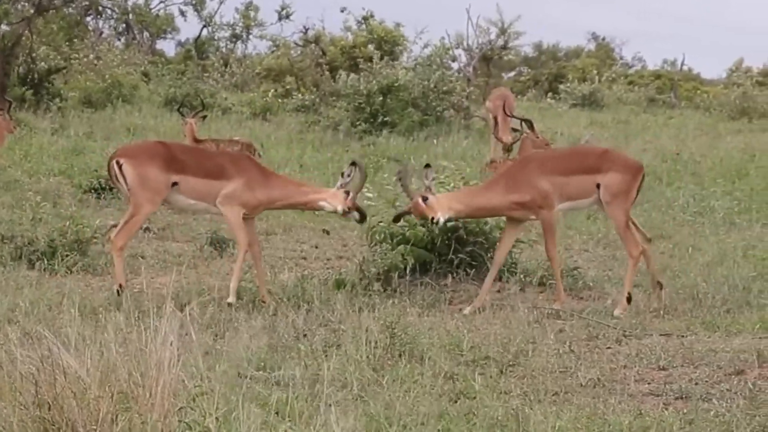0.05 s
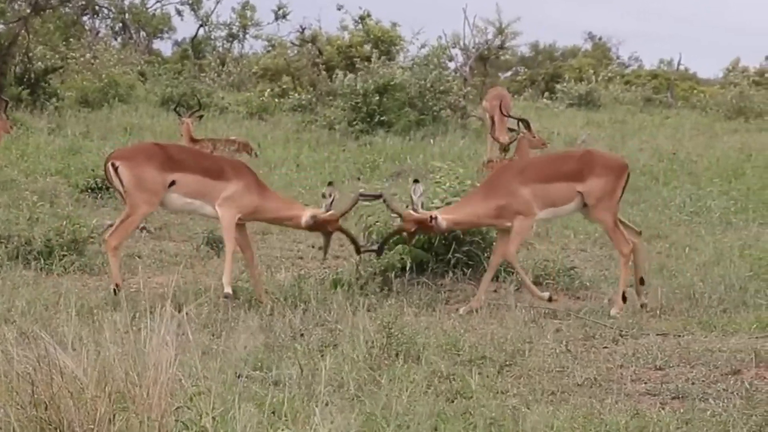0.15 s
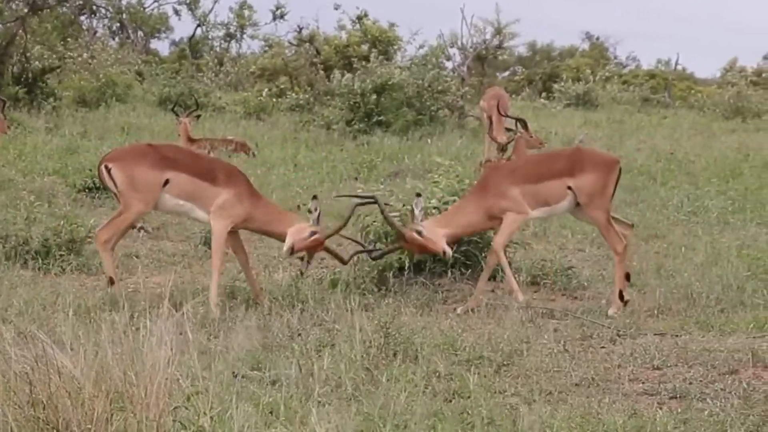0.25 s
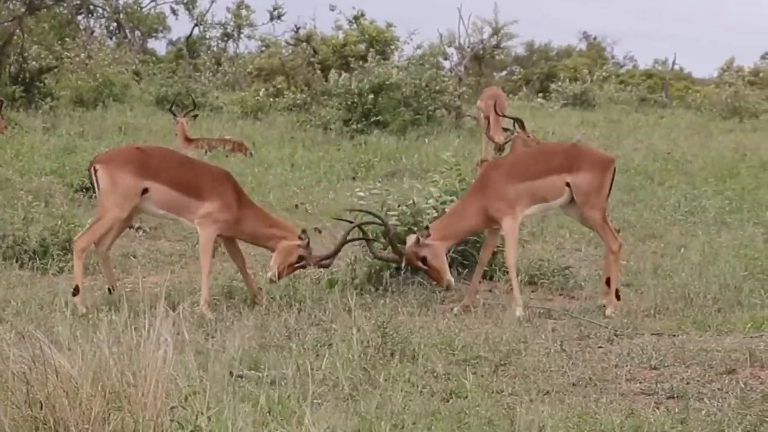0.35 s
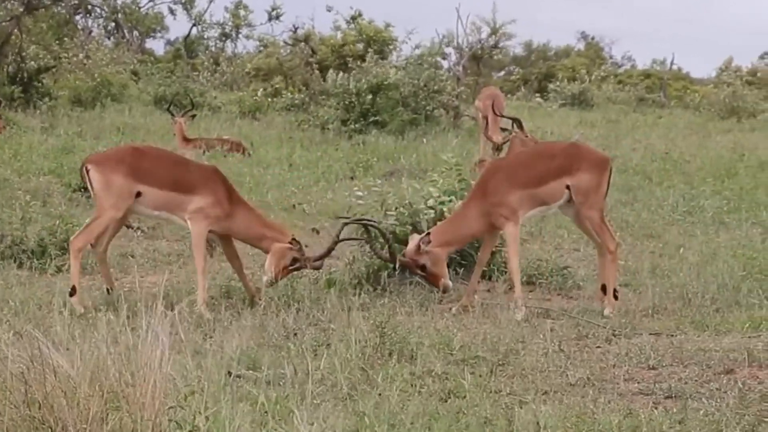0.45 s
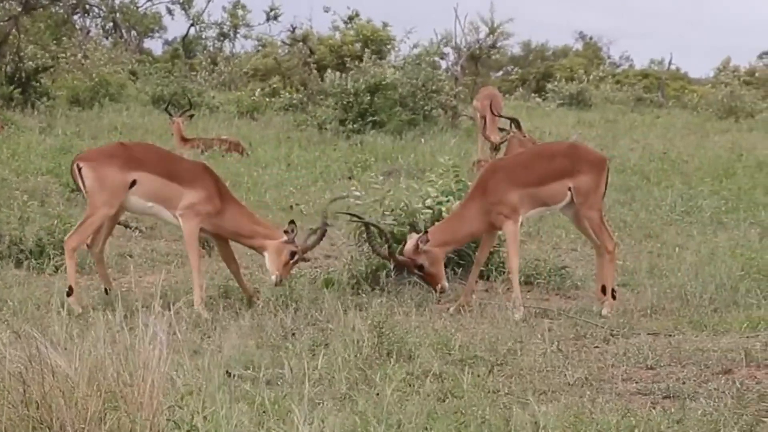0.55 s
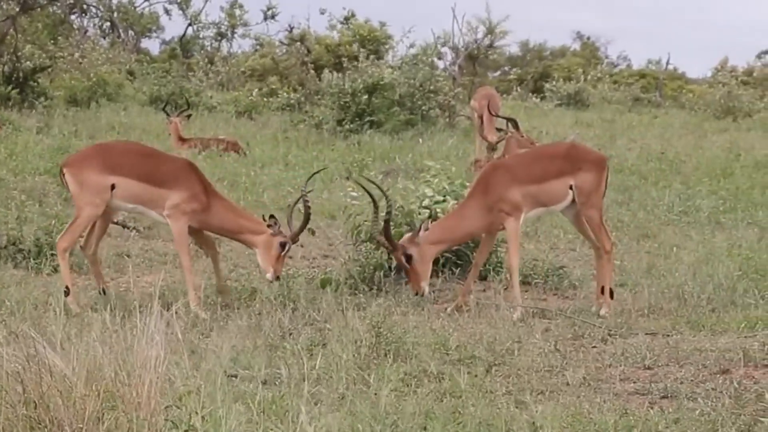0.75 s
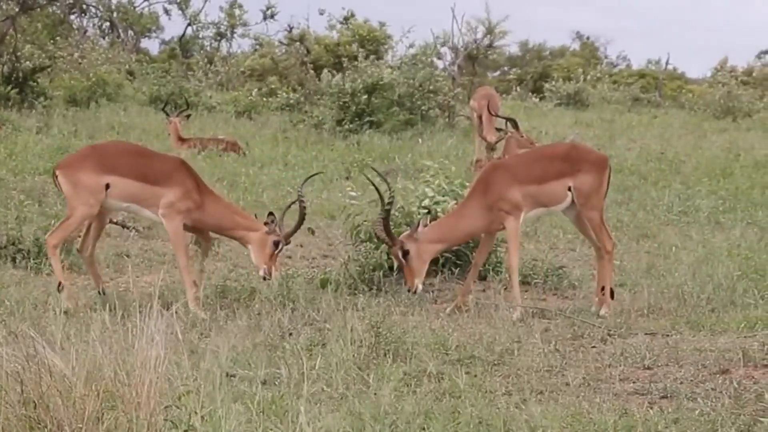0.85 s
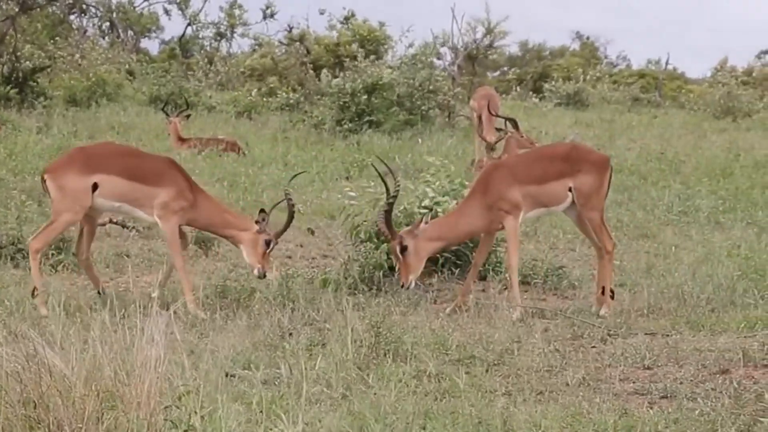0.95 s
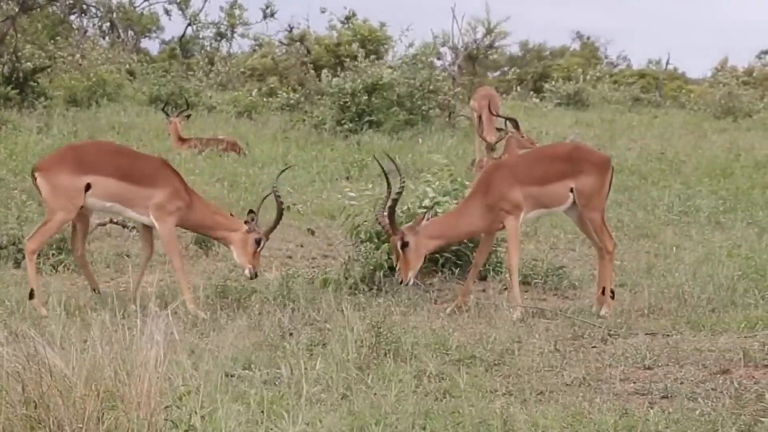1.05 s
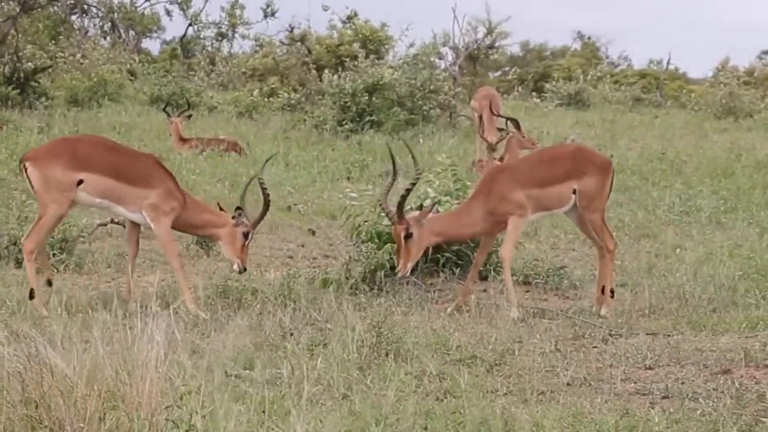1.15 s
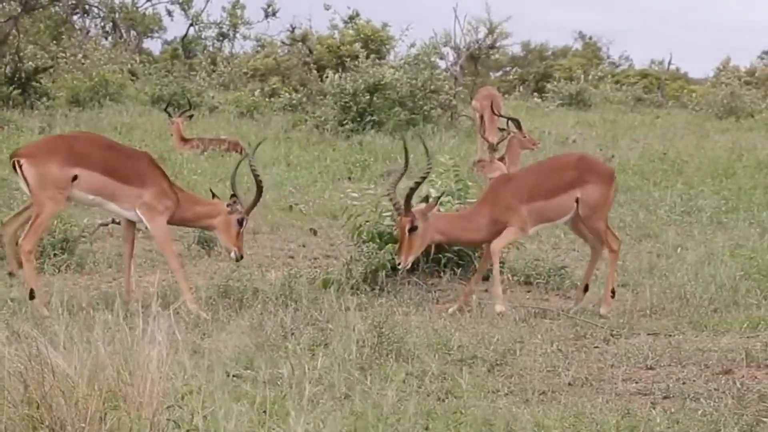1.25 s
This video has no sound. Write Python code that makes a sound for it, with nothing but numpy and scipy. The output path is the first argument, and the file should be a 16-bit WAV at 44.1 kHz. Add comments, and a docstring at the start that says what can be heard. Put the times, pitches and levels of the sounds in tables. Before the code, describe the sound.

Sharp, dry clacks of two antelope locking horns, over a faint grassland breeze.

```python
"""A thin breeze and hooves brushing grass, then a quick rattle of dry, dead clacks: two antelope lock horns
in open grassland, out in front of a stereo microphone. Each blow is a heavily damped pulse with one
resonance. The ridged horns then scrape apart in a burst of small ticks over grainy rubbing. The ground
and the bushes farther off scatter a faint echo of every clack and tick."""
import sys
import numpy as np
from scipy import signal
from scipy.fft import rfft, irfft, next_fast_len
from scipy.io import wavfile
from scipy.ndimage import uniform_filter1d, map_coordinates

SR = 44100
rng = np.random.default_rng(int(sys.argv[2]) if len(sys.argv) > 2 else 0)


def generate_wav(sig):
    """Save sig (samples, or channels by samples) to the path in sys.argv[1] as 16-bit PCM at SR."""
    pcm = np.round(np.clip(np.atleast_2d(sig).T, -1, 1) * 32767).astype(np.int16)
    wavfile.write(sys.argv[1], SR, pcm)


N = 57330  # 1.3 s

# share of a left-minus-right difference that each channel takes (left, right)
SIDES = np.array([[.5], [-.5]])


def amp(db):
    """Decibels to gain."""
    return 10 ** (np.asarray(db) / 20)


def unit(x):
    """x scaled to rms 1."""
    return x / np.sqrt(np.mean(x ** 2) + 1e-20)


def along(points, hz):
    """A curve of (Hz, value) points, read at hz on a log axis."""
    knots_hz, values = np.transpose(points)
    return np.interp(np.log(hz + 1), np.log(knots_hz + 1), values)


def wobble(rate):
    """A smooth random curve, rate knots a second."""
    knots = rng.standard_normal(int(N * rate / SR) + 4)
    return map_coordinates(knots, [np.arange(N) * rate / SR])


def filtered(x, response):
    """x through a complex response, given as a function of Hz."""
    size = next_fast_len(N + SR // 2)
    return irfft(rfft(x, size) * response(np.fft.rfftfreq(size, 1 / SR)), size)[..., :N]


def placed(x, lead_s, balance):
    """Direction at the microphone: the left leads by lead_s and is louder by the (Hz, dB) balance."""
    panned = lambda hz: amp(SIDES * along(balance, hz))
    return filtered(x, lambda hz: panned(hz) * np.exp(2j * np.pi * hz * SIDES * lead_s))


def add(track, start_s, sound):
    """Mixes a sound into a track at start_s."""
    part = track[:, round(start_s * SR):][:, :sound.shape[-1]]
    part += sound[..., :part.shape[1]]


def rush(colour, likeness):
    """Stereo noise of rms 1, from curves of (Hz, dB) colour and (Hz, left-right likeness)."""
    def mid_and_side(hz):
        turn = np.arccos(np.clip(along(likeness, hz), -1, 1)) / 2
        return amp(along(colour, hz)) * [np.cos(turn), np.sin(turn)]
    mid, side = filtered(rng.standard_normal((2, N)), mid_and_side)
    return unit(np.array([mid + side, mid - side]))


def breeze(patchy_db=2.4, smooth_above_hz=4500):
    """Air in distant leaves, a little to the left: a wide hiss, wavering in patches below a smooth top."""
    # spectrum of the leaves (frequency [Hz], level [dB])
    colour = [(30, -53), (200, -55), (300, -46.5), (450, -36.5), (650, -23), (900, -11.5), (1250, -4.5),
              (1700, -2), (2300, 0), (3100, -1), (4200, -8), (6000, -9.5), (8500, -14.5), (11000, -17.5),
              (15500, -22.5)]
    # width of the hiss (frequency [Hz], left-right likeness [0..1])
    likeness = [(100, .5), (300, 0.55), (640, .45), (1400, 0.4), (3100, .45), (6000, 0.14), (15000, .15)]
    # strength of the breeze (time [s], level [dB])
    swell = [(0, -52.5), (.07, -53), (.2, -52), (.5, -51.5), (.75, -52), (.95, -52), (1.3, -53)]
    level_db = np.interp(np.arange(N) / SR, *np.transpose(swell))
    hz, _, spectra = signal.stft(rush(colour, likeness), SR, nperseg=512)
    patches = uniform_filter1d(rng.standard_normal(spectra.shape[1:]), size=4, axis=0)  # across pitch
    patches = unit(uniform_filter1d(patches, size=7, axis=1))  # across time
    depth_db = patchy_db / (1 + (hz[:, None] / smooth_above_hz) ** 2)
    _, hiss = signal.istft(spectra * amp(depth_db * patches), nperseg=512)
    return amp(level_db) * placed(unit(hiss[:, :N]), lead_s=.00022, balance=[(1000, .77)])


def friction(strokes, colour, grain_db, likeness, grains_per_s=1500):
    """Grainy noise in strokes that swell and die away, coloured by what is rubbed."""
    t = np.arange(N) / SR
    level = sum(amp(db) * np.exp(-np.maximum((peak_s - t) / rise_s, (t - peak_s) / fall_s))
                for peak_s, rise_s, fall_s, db in strokes)
    roughness = amp(grain_db * wobble(grains_per_s))
    grains = unit(roughness * rush([(1000, 0)], [(1000, likeness)]))
    return filtered(level * grains, lambda hz: unit(amp(along(colour, hz))))


def hooves():
    """Hooves brush through the grass, faint and wide at the microphone."""
    # strokes through the grass (peak time [s], rise [s], fall [s], level [dB])
    steps = [(.093, 0.0013, 0.0032, -48), (.130, 0.016, 0.034, -48), (.24, 0.0079, 0.0051, -43.5),
             (.305, .012, 0.03, -46.5), (.371, 0.014, 0.0048, -47), (.409, .01, 0.0099, -53),
             (1.068, 0.00082, 0.00067, -45)]
    # spectrum of brushed grass (frequency [Hz], level [dB])
    grass = [(30, -62), (300, -49), (700, -28.5), (1200, -4.5), (1700, -3), (2400, 0), (3300, -3.5),
             (5000, -15), (8000, -24.5), (16000, -35)]
    return friction(steps, grass, grain_db=3.5, likeness=.36)


def horn_rubbing():
    """Horn slides on horn in two short, grainy strokes as the animals pull apart."""
    # sliding strokes (peak time [s], rise [s], fall [s], level [dB])
    rubs = [(.550, 0.0054, .005, -47.5), (.578, .012, 0.014, -38.5)]
    # spectrum of rubbed horn (frequency [Hz], level [dB])
    colour = [(30, -43), (100, -30), (200, -41), (450, -44), (800, -21.5), (1200, -4), (1700, -3),
              (2800, -0.5), (4400, 2), (6200, -5.5), (9000, -17), (11000, -33), (16000, -46)]
    return friction(rubs, colour, grain_db=4.5, likeness=.77)


def scatter(pulse, level_db, t60_s, likeness):
    """A pulse thrown back by the surroundings: a dying stereo tail just behind the direct sound."""
    t = np.arange(SR // 4) / SR
    mid, side = rng.standard_normal((2, len(t)))
    turn = np.arccos(np.clip(likeness, -1, 1)) / 2
    noise = np.cos(turn) * mid + np.sin(turn) * np.array([side, -side])
    tail = noise * amp(-60 * t / t60_s) * (1 - np.exp(-t / .00039))
    return amp(level_db) * signal.fftconvolve(pulse, tail / np.linalg.norm(tail[0]), axes=1)


def horn_contact(peak_db, ring_hz, width_hz, lift_db, tilt_db, size=2048):
    """One push through the horn: a broad, heavily damped body and a resonance set by where it is hit."""
    # spectrum of struck horn (frequency [Hz], level [dB])
    body = [(30, -67.5), (200, -57.5), (350, -52), (550, -39.5), (750, -47), (1000, -31.5), (1600, -17),
            (2200, -7), (3000, -1), (4200, 2.5), (6000, -2.5), (7100, -9), (8600, -9.5), (10200, -19),
            (12500, -23), (16000, -35.5)]
    hz = np.fft.rfftfreq(size, 1 / SR)
    ring_power = 1 + (amp(lift_db) ** 2 - 1) / (1 + ((hz - ring_hz) / width_hz) ** 2)
    octaves = np.log2(np.maximum(hz, 1000) / ring_hz)
    spectrum = amp(along(body, hz) + tilt_db * octaves) * np.sqrt(ring_power)
    # minimum phase packs the energy at the start, for a sharp attack
    cepstrum = irfft(np.log(spectrum))
    cepstrum[1:size // 2] *= 2
    cepstrum[size // 2 + 1:] = 0
    pulse = irfft(np.exp(rfft(cepstrum)))
    return amp(peak_db) * pulse / np.abs(pulse).max()


def horns(ridge_width_hz=100, ridge_pan_db=-1):
    """Blows and catching ridges near centre, each scattered by the nearby ground and farther bushes."""
    # horn blows; the hardest catch two or three times
    # (time [s], peak [dB], ring [Hz], ring width [Hz], ring lift [dB], brightness [dB/octave])
    clacks = [(.23381, -1.5, 5680, 730, 9.5, 2), (.23424, -9.6, 5670, 900, 1.7, 10),
              (.2489, -28, 4800, 900, 5, 1), (.2563, -12, 4500, 660, 7.6, -.8),
              (.26381, -6.2, 4400, 600, 7.5, -.7), (.2805, -5.2, 5570, 570, 8, -1),
              (.28063, -1.4, 3630, 260, 9.6, -1.4), (.28166, -5.4, 3340, 270, 14.2, .7),
              (.2845, -19, 4700, 400, 10, -3), (.2929, -12.3, 4760, 310, 15, -2.8),
              (.29331, -14.9, 5070, 170, 14.8, -5.4), (.2945, -26, 2450, 100, 19, -3),
              (.2993, -27, 4500, 500, 8, -3), (.31179, -13.9, 3500, 450, 11, -3.2),
              (.3251, -19.8, 3550, 400, 11, -4.1), (.3332, -33, 3300, 600, 6, -4),
              (.3695, -38, 1500, 350, 14, -8), (.4055, -29, 3000, 900, 4, -5),
              (.4084, -36, 4200, 500, 7, -4)]
    # ridges catching as the horns slide apart
    # (time [s], peak [dB], ring [Hz], ring lift [dB], brightness [dB/octave])
    ridges = [(.5355, -35.5, 4500, 7, 2), (0.545, -26.5, 5200, -3, 3), (0.5494, -30, 3970, 19, 2.5),
              (.5620, -26, 4430, -5, -0.5), (.5632, -25.5, 1960, 20, 0.5), (.5697, -33, 4600, -1, -6),
              (0.572, -35, 4000, 1, -2), (0.5753, -25, 4400, 10, -2.5), (.5773, -27.5, 1750, 20, -8),
              (0.5819, -30, 6400, 17.5, 1.5), (0.5838, -26, 6200, 11.5, 1.5), (0.5923, -30.5, 3820, 16, 0)]
    # balance of the horns at the microphone (frequency [Hz], left minus right [dB])
    balance = [(1000, -0.5), (4600, 1), (6200, -0.5), (7700, -2), (9200, -2.5), (10700, -6), (13000, -4)]
    # colour of the echo from the bushes (frequency [Hz], gain [dB])
    bush_colour = [(100, 3), (600, 6.5), (1500, 6), (3000, 0), (5000, -3.5), (10000, 1.5), (16000, -15)]
    blows = [(start_s, horn_contact(*blow)[None]) for start_s, *blow in clacks]
    to_the_right = amp(ridge_pan_db * SIDES)
    ticks = [(start_s, to_the_right * horn_contact(db, hz, ridge_width_hz, lift, tilt))
             for start_s, db, hz, lift, tilt in ridges]
    near, far = np.zeros((2, 2, N))
    for start_s, pulse in blows + ticks:
        add(near, start_s, pulse)
        add(near, start_s, scatter(pulse, level_db=-15.5, t60_s=.014, likeness=.65))  # ground
        add(far, start_s, scatter(pulse, level_db=-16, t60_s=.17, likeness=.31))  # bushes
    bush_echo = filtered(far, lambda hz: amp(along(bush_colour, hz)))
    return placed(near, lead_s=-.000016, balance=balance) + bush_echo


def scene():
    """The grassland at the microphone: two antelope sparring against a distant breeze."""
    return horn_rubbing() + hooves() + breeze() + horns()


def record(dry, top_hz=16100):
    """The recorder keeps nothing above its band limit."""
    return filtered(dry, lambda hz: hz < top_hz)


dry = scene()
out = record(dry)
generate_wav(out)
```